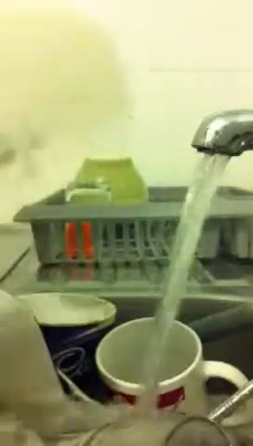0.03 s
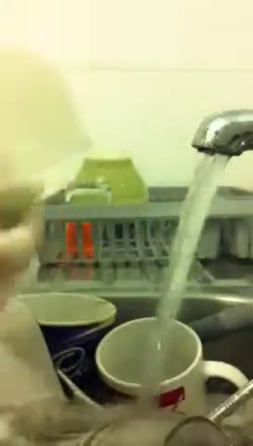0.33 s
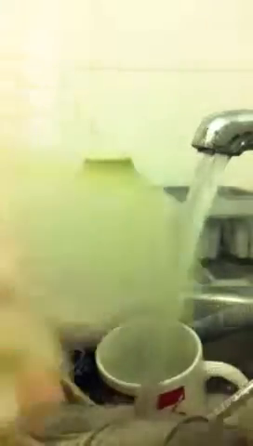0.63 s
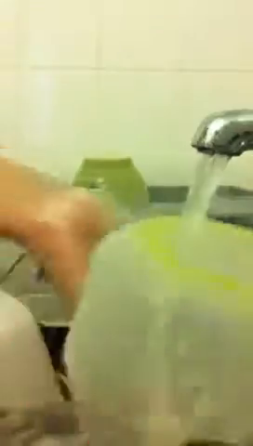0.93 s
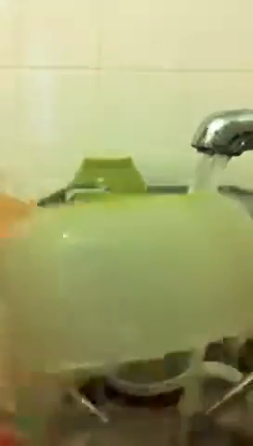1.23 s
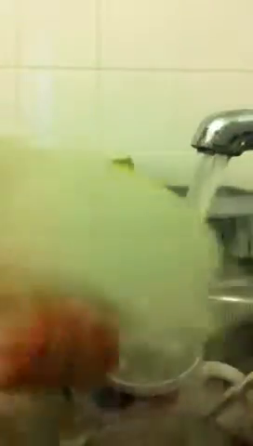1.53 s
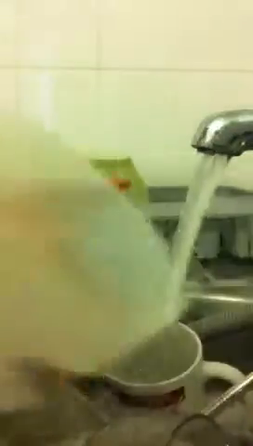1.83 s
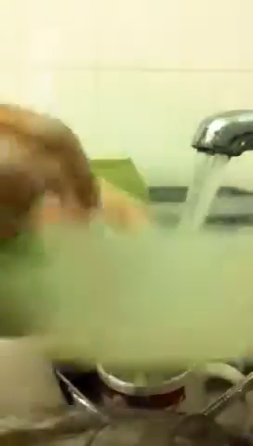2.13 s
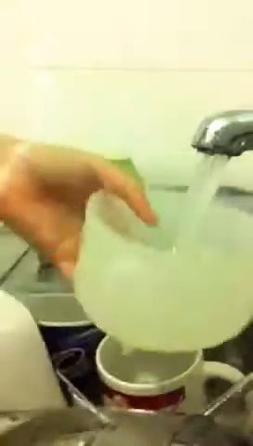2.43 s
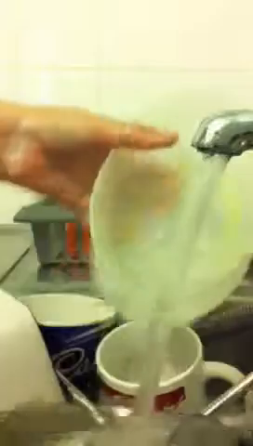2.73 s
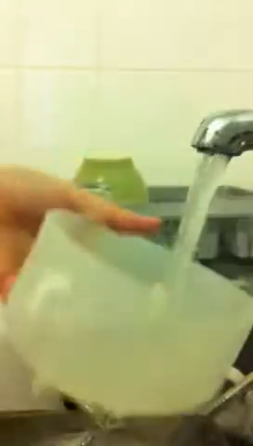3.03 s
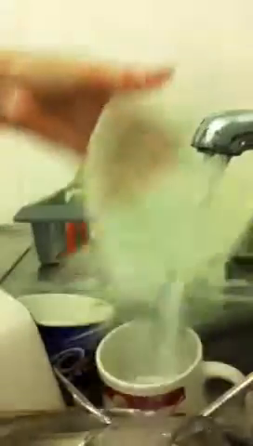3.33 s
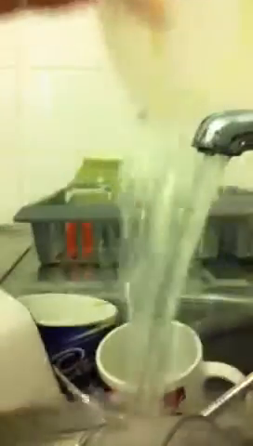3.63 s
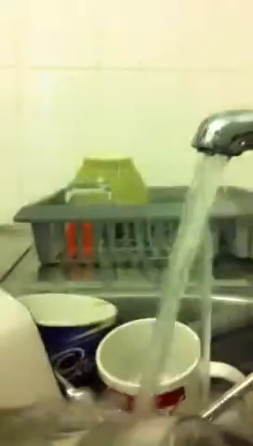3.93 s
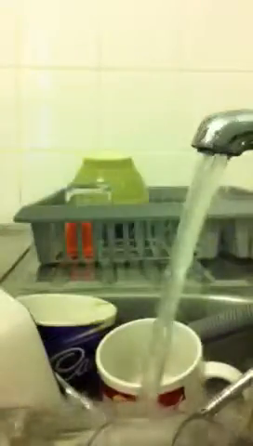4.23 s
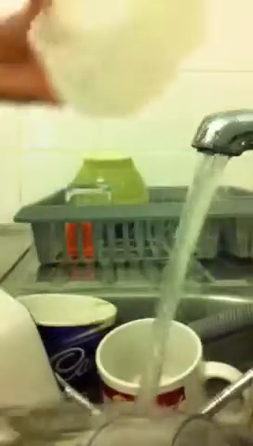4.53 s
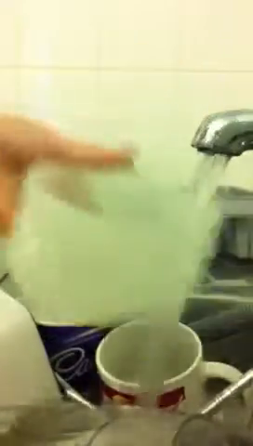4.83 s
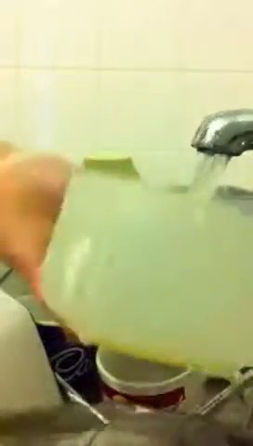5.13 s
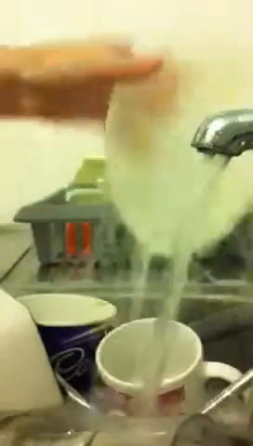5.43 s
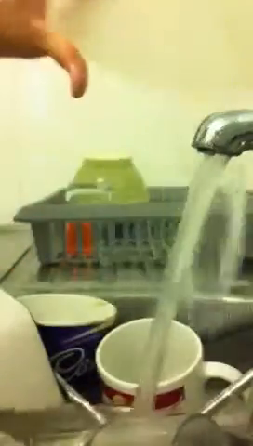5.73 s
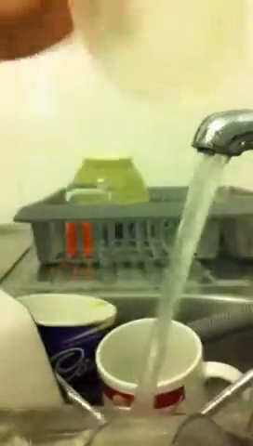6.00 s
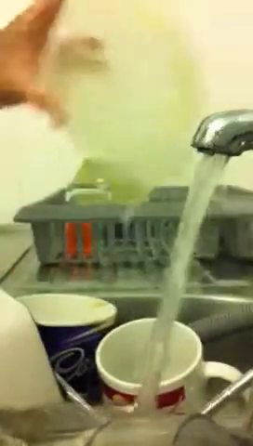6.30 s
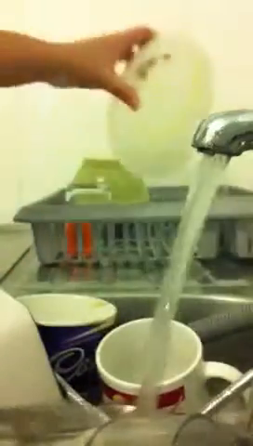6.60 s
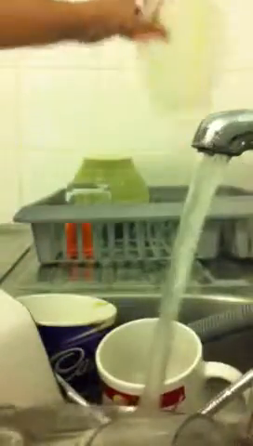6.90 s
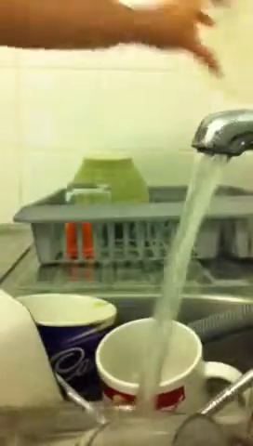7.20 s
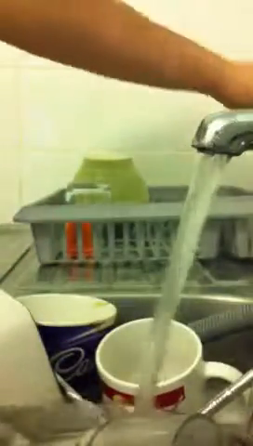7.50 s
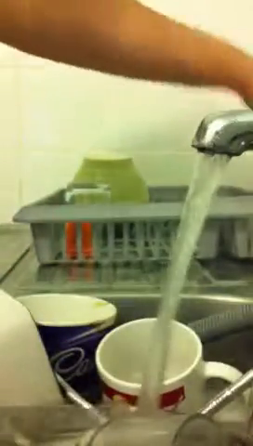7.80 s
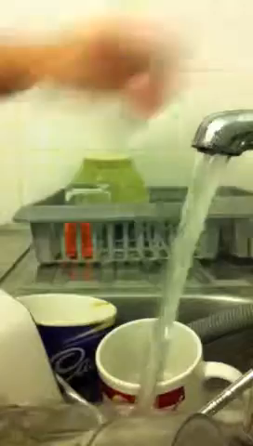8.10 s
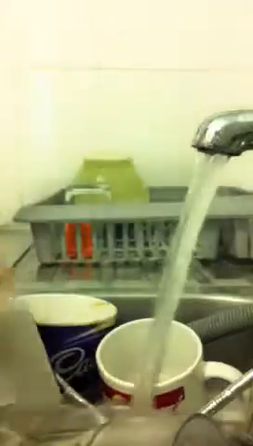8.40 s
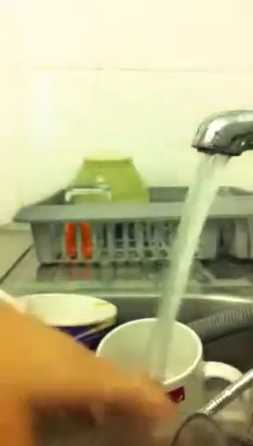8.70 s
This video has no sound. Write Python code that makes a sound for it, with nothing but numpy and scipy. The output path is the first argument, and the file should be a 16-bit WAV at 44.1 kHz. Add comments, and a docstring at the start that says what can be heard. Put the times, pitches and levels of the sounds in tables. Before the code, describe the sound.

Tap water hisses and splashes into a mug while a plastic bowl is repeatedly filled and tipped out, with dishes knocking and glass clinking.

```python
"""A small tiled kitchen, a phone microphone close to a crowded steel sink. From the start the tap's aerator
hisses and its jet spatters into a mug, traps bubbles and drums on the basin. At 0.8 s a plastic bowl
catches the jet and quiets it; dishes knock and a glass clinks. Four times the bowl fills and is tipped
out, with a few lighter knocks on the way. The last spill ends at 6.6 s, the jet runs on into the mug,
and around 8 s the dishes clatter against the basin again."""
import sys
import numpy as np
from scipy import signal
from scipy.fft import rfft, irfft
from scipy.io import wavfile
from scipy.ndimage import uniform_filter1d, map_coordinates

SR = 44100
rng = np.random.default_rng(int(sys.argv[2]) if len(sys.argv) > 2 else 0)


def wav_out(sig):
    """Save sig, one row per channel (or a flat mono array), as 16-bit PCM at SR to the path in sys.argv[1]."""
    wavfile.write(sys.argv[1], SR, np.round(np.clip(np.atleast_2d(sig).T, -1, 1) * 32767).astype(np.int16))


N = 385875
T = np.arange(N) / SR

# resonances of the steel basin and of the mug's hollow: (frequency [Hz], width [Hz], height [dB])
BASIN_MODES = [(154, 17, 4.5), (215, 37, 6), (261, 29, 7), (333.5, 33, 7), (416.4, 6.3, 10), (480, 63, 10),
               (559.5, 13, 7.5), (704, 12, 7.5), (909, 31, 6), (1393, 18, 4.5), (1767, 18, 8.5)]
MUG_MODES = [(563, 22, 15.5), (703.4, 13, 15.5), (922, 58, 15.5), (1005, 40, 10), (1590, 74, 0),
             (1730, 34, 0), (2700, 580, 5.5), (3610, 190, 2), (4060, 130, 3), (4950, 780, 1)]
# spectrum of water churning in the mug: (frequency [Hz], level [dB])
GURGLE_SPECTRUM = [(150, -38), (350, -6), (550, -9.5), (1000, -2.5), (1600, 8), (2200, -5), (3500, -9.5),
                   (8000, -81)]
# rinses of the bowl: (jet caught [s], tipped [s], empty [s], change of the jet on the mug [dB],
# pool note [Hz], pool [dB], pool spray [dB], spill note [Hz], spill [dB], runoff on the basin [dB])
RINSES = [(0.791, 1.682, 1.86, -5, 717, -54, -57, 1044, -48.5, -68),
          (2.024, 2.822, 3.49, -12.5, 850, -44, -41.5, 873, -41.5, -75),
          (2.97, 3.567, 4.21, -16, 913, -45, -56, 1780, -39, -54),
          (5.046, 5.629, 6.64, -12, 1260, -48, -44, 1255, -39.5, -62)]
POOL_FORMS_S = 0.28  # until then the caught jet slides quietly down the bowl's wall


def undb(db):
    """Decibels to gain."""
    return 10 ** (np.asarray(db) / 20)


def unit(x):
    """Scale to rms 1."""
    return x / np.sqrt(np.mean(x ** 2) + 1e-18)


def fade(t, t60):
    """Exponential decay, 60 dB down after t60 seconds."""
    return np.exp(-np.log(1000) * t / max(t60, .002))


def add(out, start, x):
    """Mix x into out from start, in seconds."""
    i = max(int(start * SR), 0)
    out[i:i + len(x)] += x[:max(N - i, 0)]


def at_peak(x, db):
    """Scale a hit so that its loudest 8 ms have the given level."""
    return x * undb(db) / np.sqrt(uniform_filter1d(x ** 2, 350).max() + 1e-18)


def gate(start, end):
    """Soft on-off window."""
    return uniform_filter1d(1. * ((T > start) & (T < end)), size=1700)


def swell(start, end, db_per_s):
    """Soft window whose level changes steadily from its start."""
    return gate(start, end) * undb(db_per_s * np.clip(T - start, 0, end - start))


def walk(per_s):
    """Random values, per_s of them a second, slewed and scaled to rms 1."""
    hold = int(SR / per_s)
    steps = rng.standard_normal(N)[np.arange(N) // hold]
    return unit(uniform_filter1d(steps, hold // 2 + 1))


def colour(x, spectrum, modes=(), size=8192):
    """Minimum-phase filter: a smooth spectrum of (Hz, dB) points with resonances standing on it."""
    f = np.fft.rfftfreq(size, 1 / SR) + 1
    hz, db = np.transpose(spectrum)
    smooth = undb(np.interp(np.log(f), np.log(hz), db))
    power = 1 + sum(undb(2 * height) / (1 + (2 * (f - centre) / width) ** 2)
                    for centre, width, height in modes)
    cepstrum = irfft(np.log(smooth * np.sqrt(power)))
    cepstrum[1:size // 2] *= 2
    cepstrum[size // 2 + 1:] = 0
    return signal.fftconvolve(x, irfft(np.exp(rfft(cepstrum))))[:len(x)]


def impacts(per_s, spread_db, size=N):
    """Droplet impacts at random times and of random strength."""
    weight = undb(spread_db * np.minimum(rng.exponential(size=size), 5))
    return (rng.random(size) < per_s / SR) * weight * rng.standard_normal(size)


def bubble(hz, t60, octaves_per_s):
    """A trapped bubble swells within a cycle, rings and climbs in pitch as it nears the surface."""
    t = T[:int(max(t60, .002) * SR)]
    phase = 2 * np.pi * np.cumsum(hz * 2 ** (octaves_per_s * t)) / SR
    return np.sin(phase) * fade(t, t60) * (1 - np.exp(-2 * hz * t))


def bubbles(hz, octaves, cycles, spread_db, count, size=N):
    """A cloud of bubbles scattered round a pitch; small ones die sooner."""
    out = np.zeros(N)
    for when, pitch, weight, life, glide in rng.random((count, 5)):
        note_hz = min(hz * 2 ** (octaves * (2 * pitch - 1)), SR / 3)
        t60 = cycles * (.5 + life) / note_hz
        gain = undb(-spread_db * np.log(weight + 0.12))
        add(out, when * size / SR, gain * bubble(note_hz, t60, 0.52 * glide / t60))
    return unit(out[:size])


def reflections(t60, room_db, basin_db):
    """Direct sound, quick echoes from the basin walls, then the short, duller ring of the tiled room."""
    t = T[:SR // 3]
    basin, room = rng.standard_normal((2, len(t)))
    basin = basin * fade(t, 0.034) * (t > .001)
    room = signal.lfilter([1], [1, -.4], room * fade(t, t60) * (t > .006))
    response = undb(basin_db) * basin / np.linalg.norm(basin)
    response += undb(room_db) * room / np.linalg.norm(room)
    response[0] = 1
    return response / np.linalg.norm(response)


def kitchen(x, t60, room_db, basin_db, size=8192):
    """Hands, bowl and splashes keep moving, so the pattern of echoes keeps changing."""
    out, padded, hop = np.zeros(N + size), np.pad(x, size), size // 2
    for i in range(0, N + hop, hop):
        piece = padded[i + hop:i + hop + size]
        piece = piece * np.hanning(size)[:len(piece)]
        heard = signal.fftconvolve(piece, reflections(t60, room_db, basin_db))
        out[i:i + len(heard)] += heard[:len(out) - i]
    return out[hop:hop + N]


def aerator():
    """Air drawn into the jet: a steady fine fizz at the spout."""
    # spectrum of the fizz: (frequency [Hz], level [dB])
    hiss_spectrum = [(60, -17), (110, -24.5), (155, -2.5), (210, -7), (400, -14.5), (1400, -18.5),
                     (2200, -5), (3600, -10), (7400, -10.5), (10200, -1.5), (13500, -3.5), (16000, -11)]
    flicker_db = .4 * walk(per_s=25)
    return unit(colour(impacts(per_s=11000, spread_db=0), hiss_spectrum)) * undb(-44 + flicker_db)


def clinks():
    """After a hard tick, close pairs of glass modes beat and flutter as the glass chatters on dishes."""
    # strikes on the glass: (time [s], level [dB], tilt [dB/octave], middle pair of modes, set by
    # the spot struck [dB], tick against ring [dB], tuning [ratio], chatter [0-1])
    strikes = [(0.893, -15, 0, -7, -2, 1.012, .6), (1.232, -16.5, 2, 2, -13, 1, 0.4),
               (3.113, -27.5, -5, -3, -12, 1, .45), (3.972, -32, -12, -8, -15, 1.03, .4),
               (4.232, -32, -3, -8, -14, 1, 0.4)]
    # modes of the glass: (frequency [Hz], level [dB], t60 [s])
    glass_modes = [(2675, -8, 0.24), (2735, -6, 0.26), (5400, -4, 0.25), (5445, -10, 0.17),
                   (8835, -3, 0.17), (8900, -5, 0.24), (8975, -5, 0.22), (9090, -5, 0.15),
                   (13340, -14, 0.15), (13400, -15, 0.13)]
    # spectrum of the contact: (frequency [Hz], level [dB])
    tick_spectrum = [(1000, 15), (3000, 19), (5000, -12), (7000, 15), (9200, 8), (11000, 6), (13000, -12),
                     (16000, -15)]
    out, t = np.zeros(N), T[:SR // 2]
    flash = undb(4) * fade(t, .075)  # every mode starts loud, then sings on
    for start, db, tilt_db, middle_db, tick_db, tuning, chatter in strikes:
        ring = 0
        for hz, mode_db, t60 in glass_modes:
            jolts = signal.lfilter([1], [1, -.99], rng.standard_normal((2, len(t))))
            flutter = 1 + chatter * unit(jolts[0]) + 1j * chatter * unit(jolts[1])
            tone = np.imag(flutter * np.exp(2j * np.pi * hz * tuning * t))
            spot_db = middle_db * (5000 < hz < 6000)
            gain = undb(mode_db + spot_db + tilt_db * np.log2(hz / 5000))
            ring = ring + gain * (fade(t, t60) + flash) * tone
        contact = rng.standard_normal(len(t)) * (fade(t, 0.052) + 2 * fade(t, 0.02))
        tick = colour(contact, tick_spectrum)
        add(out, start, at_peak(at_peak(ring, 0) + at_peak(tick, tick_db), db))
    return out


def knocks():
    """A dish hits the basin: a crack, a clatter on its own note, the longer body and thud of steel."""
    # dish hits: (time [s], level [dB], relative thud [dB], relative crack [dB], note [Hz], t60 [s])
    hits = [(0.878, -21.5, -16, -9, 1330, 0.19), (0.895, -22, -22, -3, 1380, 0.2),
            (0.943, -19.5, -6, -22, 704, 0.11), (0.955, -21.5, -3, -16, 910, 0.091),
            (0.966, -18, -10, -13, 755, 0.12), (0.984, -20.5, -17, -16, 435, 0.15),
            (1.002, -20, -33, -18, 720, 0.13), (1.119, -20, -13, -16, 1150, 0.11),
            (1.225, -23, -14.5, -32, 1380, 0.15), (3.069, -23.5, -11.5, -7, 1700, 0.054),
            (3.076, -19.5, -12.5, -22, 670, 0.11), (4.147, -23.5, -10, -20, 900, 0.08),
            (7.724, -38, 8, -8, 330, 0.11), (7.789, -29, -9, 1, 935, 0.1), (7.799, -20.5, 0, -6, 443, 0.13),
            (7.863, -16.5, -11, -14, 530, 0.096), (7.91, -18, 0, -4.5, 600, 0.09),
            (7.917, -19.5, -4, -20, 710, 0.095), (7.924, -21.5, -4.5, -19, 2380, 0.061),
            (7.941, -25, -2, -15, 520, 0.12), (7.970, -26.5, -7, -1.5, 606, 0.16),
            (7.985, -23.5, -9, -9, 450, .1), (8.008, -28, -2, -6, 434, 0.13),
            (8.054, -29, -2.5, -2.5, 643, 0.11), (8.127, -29.5, -5, -26, 477, 0.065),
            (8.204, -27, -12, -28, 580, 0.042), (8.220, -28.5, -9, -6, 1440, 0.1),
            (8.316, -33, -27, -5, 895, 0.064)]
    # spectra of the four parts of a hit: (frequency [Hz], level [dB])
    body_spectrum = [(100, -34.5), (300, -4.5), (500, -0.5), (800, 0), (1200, -4.5), (2000, -21.5),
                     (4000, -21.5), (9000, -36)]
    clatter_spectrum = [(200, -36.5), (600, -5.5), (1100, 4), (1700, 2), (2500, -3), (4000, -26.5),
                        (9000, -33)]
    thud_spectrum = [(25, -31), (60, -19), (100, -1), (125, 6), (165, 7.5), (260, 1.5), (400, -1.5),
                     (600, -18.5), (1500, -25)]
    crack_spectrum = [(600, -39), (2000, 5), (3000, 9.5), (6000, 5.5), (9000, -2), (16000, -13)]
    out, t = np.zeros(N), T[:int(SR * .7)]
    for start, db, thud_db, crack_db, hz, t60 in hits:
        noise = rng.standard_normal((4, len(t)))
        modes = list(BASIN_MODES) + [(hz, hz / 6, 8)]
        body = colour(noise[0] * (fade(t, t60 * 1.3) + 0.94 * fade(t, 0.02)), body_spectrum, modes)
        clatter_decay = fade(t, t60 * 0.59) + 0.39 * fade(t, 0.015)
        clatter = colour(noise[1] * clatter_decay, clatter_spectrum, modes)
        thud = colour(noise[2] * fade(t, t60 * 1.94), thud_spectrum, BASIN_MODES)
        crack = colour(noise[3] * (fade(t, t60 * .5) + .5 * fade(t, 0.008)), crack_spectrum)
        light_db = 5 * np.log2(hz / 900)  # a light, high dish clatters more against its body
        blow = at_peak(body, 0) + at_peak(clatter, light_db + 2)
        add(out, start, at_peak(blow, db) + at_peak(thud, db + thud_db) + at_peak(crack, db + crack_db))
    return out


def plops():
    """Single large bubbles ring, each with the plump slap that traps it."""
    # (time [s], level [dB], pitch [Hz], t60 [s], slap against ring [dB], climb [octaves/s])
    large_bubbles = [(0.126, -30.5, 885, 0.036, -3, 13), (0.528, -39, 1180, 0.064, 9, 12),
                     (1.343, -39, 737, 0.043, -11, 7.5), (1.394, -39, 716, 0.046, -7, 6),
                     (1.605, -31, 1340, 0.096, -7, 4), (1.690, -26.5, 805, 0.037, -1.5, 16),
                     (1.717, -32, 564, 0.093, -24, 2), (1.714, -28, 1280, 0.053, -17, 28),
                     (1.881, -31.5, 924, 0.027, -6, 12), (1.941, -34, 930, 0.03, -1, 15),
                     (2.271, -38, 1094, 0.1, -8, 28), (2.314, -39, 880, 0.075, -12, 3),
                     (2.373, -36, 1700, 0.046, -14, 3), (2.431, -40, 886, 0.051, -10, 4),
                     (2.466, -42, 778, 0.084, 4, 4.9), (2.629, -42, 723, 0.06, -13, 4.3),
                     (2.875, -39, 885, 0.063, -8, 3.5), (2.938, -39.5, 850, 0.043, 6, 5),
                     (3.029, -30.5, 2330, 0.03, 0, 3.6), (3.054, -32, 870, 0.07, -6, 3),
                     (3.24, -39.5, 1004, 0.099, 2.5, 4.7), (3.449, -38, 1170, 0.036, -14, 6),
                     (4.303, -31, 1186, 0.16, -2, 14), (4.476, -34.5, 930, 0.039, -2, 6.2),
                     (4.502, -29.5, 514, 0.034, -4, 7.9), (4.665, -34.5, 523, 0.059, -7, 6.6),
                     (4.735, -38.5, 920, 0.057, 5, 3.2), (4.87, -32, 807, 0.058, -8, 23),
                     (4.958, -35, 1550, 0.043, -6, 4), (4.993, -30.5, 946, 0.031, -22, 6.6),
                     (5.018, -36, 2700, 0.035, -15, 2), (5.342, -43, 950, 0.06, -18, 4.6),
                     (5.453, -42, 1280, 0.06, -10, 4.6), (5.506, -35, 1680, 0.06, 2, 15),
                     (5.752, -27.5, 950, 0.035, 2.5, 7.5), (5.854, -26, 910, 0.022, 6.5, 11),
                     (6.032, -29, 1160, 0.023, 1, 10), (6.097, -29, 1028, 0.086, -8, 4.6),
                     (6.41, -39, 762, 0.04, 5, 10), (6.791, -30.5, 980, 0.053, -2, 10),
                     (6.869, -35.5, 700, 0.034, 3.5, 6), (7.203, -34, 974, 0.06, -10, 4.2),
                     (7.376, -33.5, 930, 0.075, -5, 4), (7.452, -37.5, 1520, 0.055, -8, 4)]
    out, t = np.zeros(N), T[:SR // 3]
    for start, db, hz, t60, slap_db, climb in large_bubbles:
        smack = rng.standard_normal(len(t)) * (fade(t, t60) + 0.93 * fade(t, 0.0058))
        spectrum = [(hz / 7, -38), (hz / 2.3, -8), (hz, 0), (hz * 1.43, -2), (hz * 2, -17), (hz * 5, -32)]
        add(out, start, at_peak(bubble(hz, t60, climb), db))
        add(out, start, at_peak(colour(smack, spectrum), db + slap_db))
    return out


def free_jet():
    """Gain of the jet on the mug: full, except while the bowl is in its way."""
    return undb(sum(db * gate(caught, tipped) for caught, tipped, _, db, *_ in RINSES))


def stray_splats():
    """Small splats thrown at random while the jet reaches the mug, as rows for splats()."""
    free = free_jet()
    return [(when * N / SR, -35 + 2.5 * (2 * size - 1), 4600 * 2 ** (0.7 * (2 * pitch - 1)), -41, 0.09)
            for when, size, pitch in rng.random((14, 3)) if free[int(when * N)] > undb(-1)]


def splats():
    """Water splats on the crockery: bright spray with a hollow slap inside the mug."""
    # (time [s], spray [dB], spray centre [Hz], hollow slap [dB], spray t60 [s])
    big_splats = [(0.4137, -23.5, 2880, -36, 0.14), (0.5055, -27.5, 4900, -46, 0.063),
                  (0.7151, -34, 7200, -39, 0.11), (0.746, -32.5, 2800, -54, 0.035),
                  (1.9445, -38, 5550, -57, 0.058), (1.977, -31.5, 9200, -53, 0.052),
                  (2.836, -34.5, 2820, -59, 0.092), (2.8744, -32.5, 3820, -37, 0.076),
                  (2.9582, -31.5, 5400, -47, 0.029), (3.508, -33, 4800, -61, 0.29),
                  (3.5877, -26, 4140, -33, 0.13), (3.6735, -31, 2420, -28, 0.062),
                  (3.9387, -25, 3980, -51, 0.1), (4.3807, -33, 4440, -54, 0.17),
                  (4.762, -32, 4240, -30, 0.09), (5.345, -36.5, 4440, -41, 0.13),
                  (5.4418, -30.5, 4460, -43, 0.065), (5.565, -34.5, 5040, -45, 0.058),
                  (5.635, -33, 4200, -50, 0.086), (5.6471, -40, 2050, -28.5, 0.18),
                  (5.707, -27, 5300, -29, 0.05), (5.873, -29.5, 5100, -39, 0.075),
                  (6.0319, -38, 5000, -28.5, 0.39), (6.3178, -31, 3950, -60, 0.089),
                  (6.8166, -31, 4000, -33, .12), (7.027, -30.5, 3740, -43, 0.05),
                  (7.2868, -34, 3550, -29.5, 0.16), (7.632, -32.5, 4700, -33, 0.43),
                  (8.545, -38, 4200, -25, .1)]
    out, t = np.zeros(N), T[:SR // 3]
    for start, spray_db, hz, slap_db, t60 in list(big_splats) + stray_splats():
        noise = rng.standard_normal((2, len(t)))
        spectrum = [(hz / 4, -26), (hz / 1.07, -10), (hz, 0), (hz * 1.1, -10), (hz * 3, -28)]
        spray = colour(noise[0] * (fade(t, t60) + 0.66 * fade(t, 0.0067)), spectrum)
        slap = colour(noise[1] * fade(t, 0.055), GURGLE_SPECTRUM, MUG_MODES)
        add(out, start, at_peak(spray, spray_db) + at_peak(slap, slap_db))
    return out


def sloshes():
    """Heavy sloshes leave the tipped bowl: dense droplet impacts round one note."""
    # (start [s], end [s], level [dB], note [Hz])
    surges = [(3.616, 3.728, -35, 1760), (3.892, 4.186, -32.5, 1670), (5.966, 6.097, -33, 1340)]
    out = np.zeros(N)
    for start, end, db, hz in surges:
        spectrum = [(hz / 8, -30), (hz / 0.99, -10), (hz, -4), (hz * 0.98, -8), (hz * 3, -24)]
        churn = colour(impacts(per_s=1100, spread_db=2.5), spectrum)
        out += undb(db) * unit(churn) * gate(start, end)
    return out


def plunge(start, end, hz, octaves):
    """Up to a second of water plunging into a pool: like-sized bubbles, and churn ringing the hollow."""
    out = np.zeros(N)
    fizz = bubbles(hz, octaves, cycles=28, spread_db=10.5, count=120, size=SR)
    spectrum = [(hz / 4, -32), (hz / 1.1, -11), (hz * 1.05, -7), (hz * 4.5, -11), (hz * 7, -30)]
    modes = [(hz, hz / 6, 10), (2 * hz, hz / 7, 14), (3.15 * hz, hz / 5, 7)]
    hollow = colour(impacts(per_s=900, spread_db=2.2, size=SR), spectrum, modes)
    position = np.cumsum(1 + .025 * walk(per_s=9)[:SR])  # the note sways as the water rocks
    swaying = map_coordinates(hollow, [position], mode="mirror")
    add(out, start, unit(fizz + unit(swaying)))
    return out * gate(start, end)


def pours():
    """The jet fills the bowl; then it spills over the mug and dishes with less orderly bubble sizes."""
    out = np.zeros(N)
    for caught, tipped, empty, _, pool_hz, pool_db, _, spill_hz, spill_db, _ in RINSES:
        out += undb(pool_db) * plunge(caught + POOL_FORMS_S, tipped, pool_hz, octaves=0.316)
        out += undb(spill_db - 6.5) * plunge(tipped, empty, spill_hz, octaves=0.566)
    gulps = unit(undb(5.5 * walk(per_s=26)))  # plunging water traps air in gulps
    return out * gulps


def flow():
    """Gains of gurgle, spatter and drumming: the free jet plus the pools and spills of the rinses."""
    free = free_jet() * undb(0.46 * walk(per_s=9))  # the jet sways on its target
    gurgle, spatter, drum = free * undb(-44), free * undb(-40), free * undb(-53.5)
    for caught, tipped, empty, _, _, _, spray_db, _, spill_db, runoff_db in RINSES:
        # a new pool gurgles just before it sprays, and sprays less as it deepens
        pool_spray = undb(spray_db) * swell(caught + POOL_FORMS_S + 0.0026, tipped, db_per_s=-10)
        # of a spill, the spray lands first and the bulk of the water last
        spill_spray = undb(spill_db + 2.5) * swell(tipped, empty, db_per_s=-16)
        spatter = np.hypot(spatter, pool_spray + spill_spray)
        gurgle = np.hypot(gurgle, undb(spill_db - 18) * swell(tipped, empty, db_per_s=-5))
        drum = np.hypot(drum, undb(runoff_db) * swell(tipped, empty, db_per_s=11.5))
    return gurgle, spatter, drum


def jet():
    """The jet breaks up on the mug: spray ticks, bubbles ring in the hollow, runoff drums on steel."""
    # spectra of the spray, the finest droplets and the runoff: (frequency [Hz], level [dB])
    spatter_spectrum = [(400, -37), (1200, -1.5), (2200, 2), (3000, -3.5), (5000, 0), (7500, 1),
                        (10000, 2.5), (13000, -21), (16000, -38)]
    mist_spectrum = [(3000, -50), (7000, -27), (10000, -15), (13000, 8), (16000, -1)]
    drum_spectrum = [(25, -13), (60, -14), (100, -4), (150, -0.5), (270, -3.5), (400, -1.5), (600, 1),
                     (1500, -47.5)]
    gurgle_db, spatter_db, drum_db = 20 * np.log10(flow())
    lumps = walk(per_s=45)  # the jet arrives in uneven lumps that drive spatter and gurgle
    ticks = unit(impacts(per_s=4000, spread_db=2.5))
    fizz = bubbles(hz=4917, octaves=0.899, cycles=43, spread_db=5, count=2000)
    spray = (ticks + undb(-9) * fizz) * undb(2 * lumps)
    spatter = unit(colour(spray, spatter_spectrum, MUG_MODES)) * undb(spatter_db)
    churn = unit(colour(impacts(per_s=700, spread_db=1.5), GURGLE_SPECTRUM, MUG_MODES))
    trapped_air = bubbles(hz=1095.5, octaves=1, cycles=26, spread_db=2, count=900)
    pops = unit(colour(trapped_air, GURGLE_SPECTRUM, MUG_MODES))
    gurgle = unit((churn + undb(2) * pops) * undb(1.3 * lumps)) * undb(gurgle_db)
    # harder splashing throws off disproportionately more fine spray
    mist_db = 2 * (np.minimum(spatter_db, -34) + 36.5) - 44
    mist = unit(colour(impacts(per_s=3300, spread_db=4), mist_spectrum)) * undb(mist_db)
    drum = unit(colour(impacts(per_s=570, spread_db=-3), drum_spectrum, BASIN_MODES)) * undb(drum_db)
    return spatter + mist + gurgle + drum


def scene():
    """At the sink: the water deep in the basin, the dishes nearer the microphone, the spout dry."""
    water = jet() + pours() + sloshes() + plops() + splats()
    water = kitchen(water, t60=0.35, room_db=-5.5, basin_db=-4)
    dishes = kitchen(knocks() + clinks(), t60=0.35, room_db=-6, basin_db=-8.5)
    return (aerator() + water + dishes)[None]


def record(dry):
    """The phone's mono microphone thins the deep bass and cuts the top near 16 kHz."""
    thin = colour(dry[0], [(30, -14), (70, -8.5), (105, -10), (145, -1.5), (1000, 0.5)])
    lowpass = signal.ellip(10, .2, 80, 15950, fs=SR, output="sos")
    return signal.sosfilt(lowpass, thin)[None]


dry = scene()
out = record(dry)
wav_out(out)
```